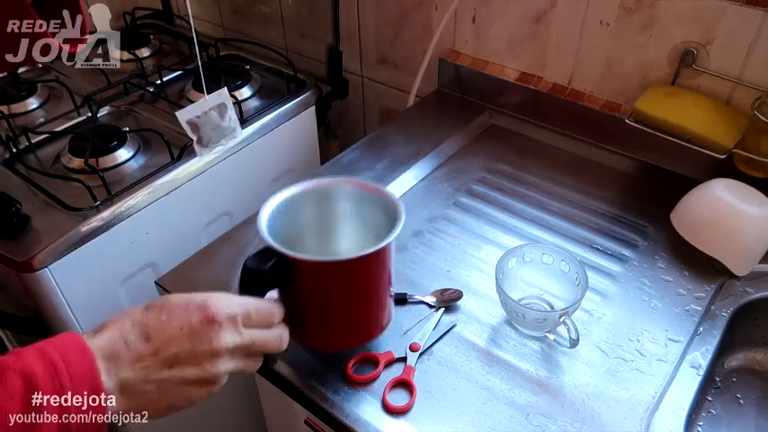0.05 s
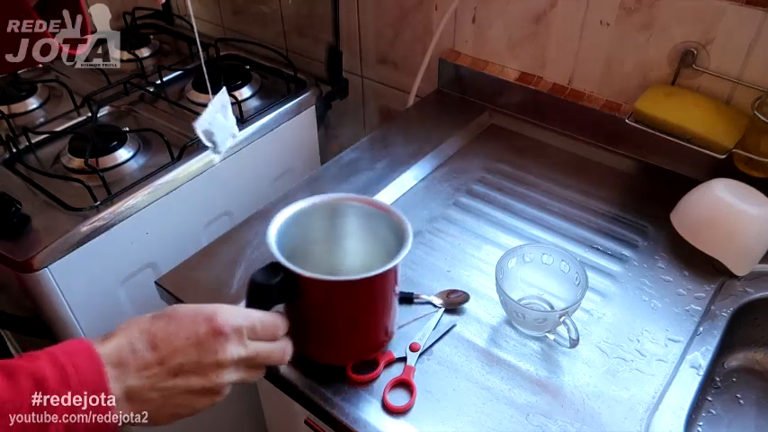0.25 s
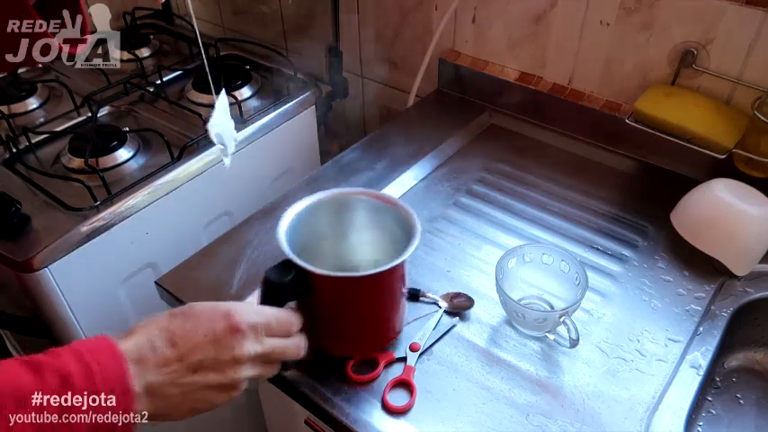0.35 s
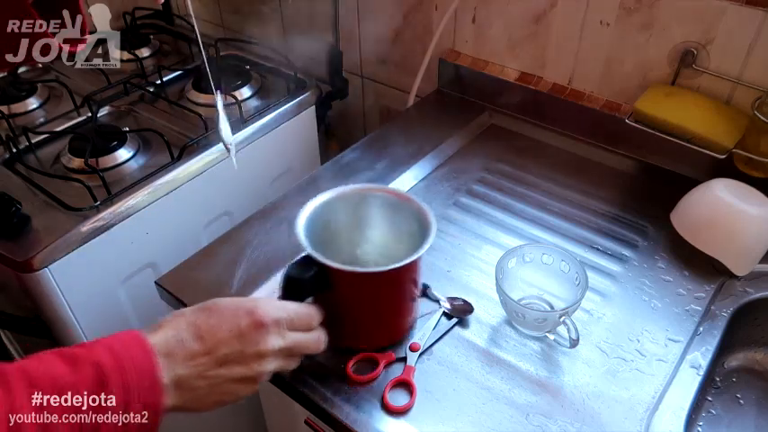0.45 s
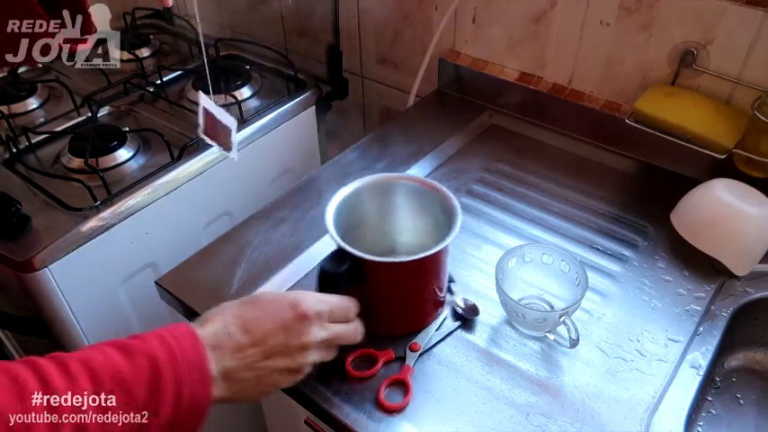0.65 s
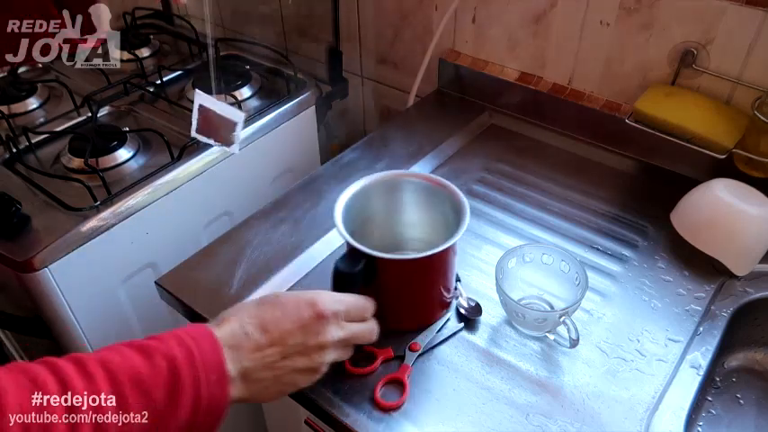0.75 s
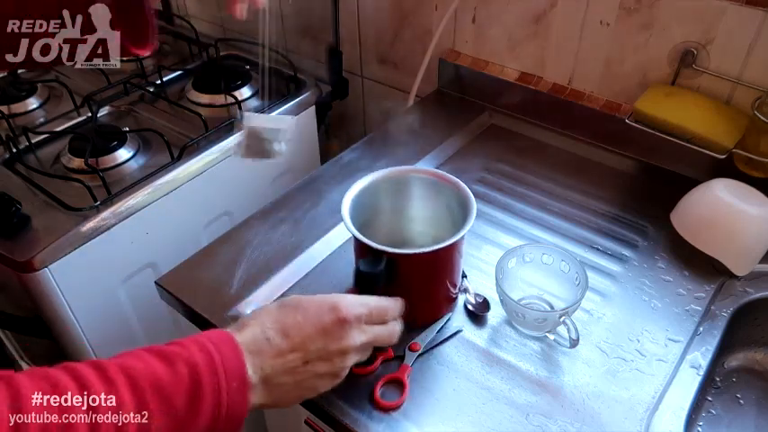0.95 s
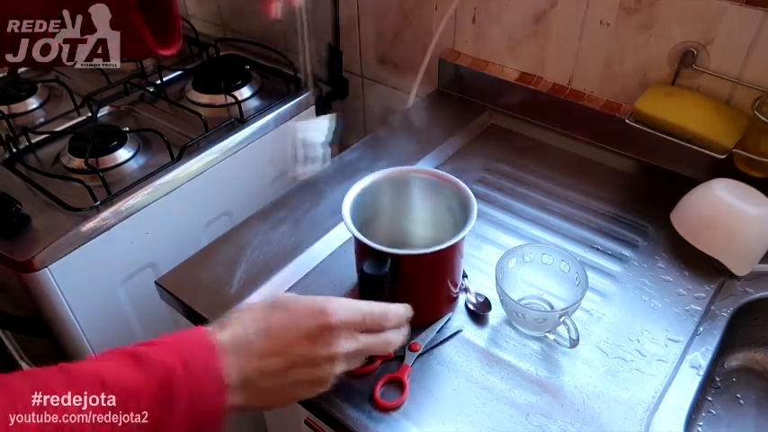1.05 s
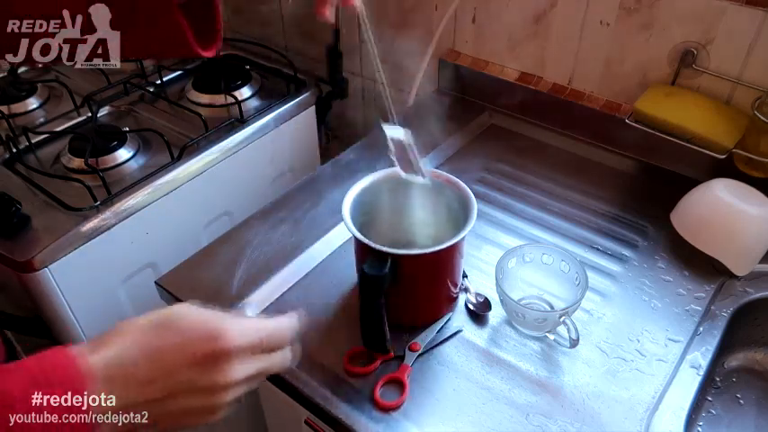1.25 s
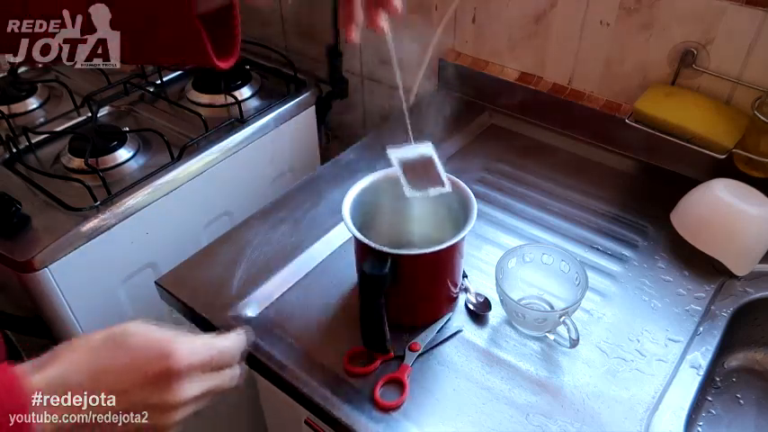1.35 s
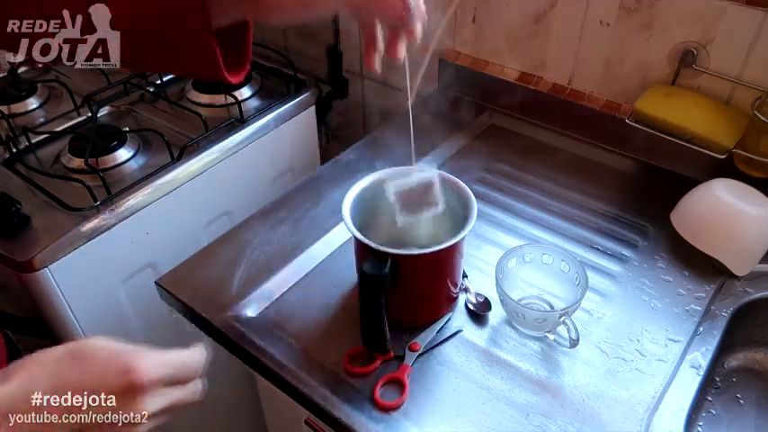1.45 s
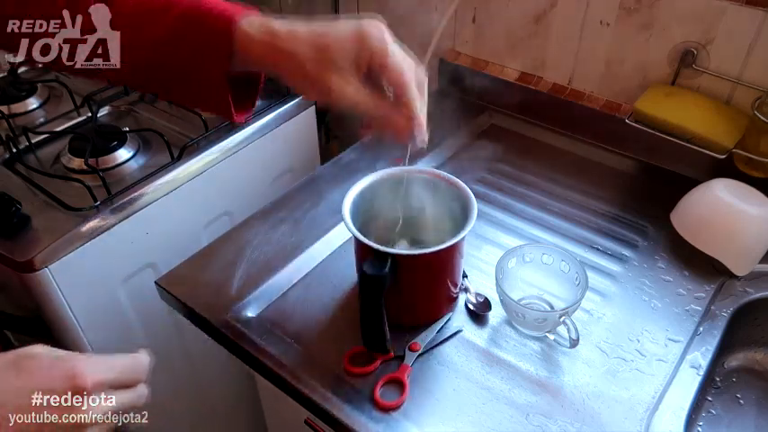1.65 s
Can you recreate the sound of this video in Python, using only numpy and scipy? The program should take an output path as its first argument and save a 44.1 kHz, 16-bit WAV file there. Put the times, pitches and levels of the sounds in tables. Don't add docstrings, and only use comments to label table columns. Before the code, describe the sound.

A metal mug meets a steel counter in a hard-walled kitchen: a dull edge knock with small rattling ticks at 0.23 seconds, a light tick at 0.45, then a hard bright knock at 0.48, settling by 0.55. The sheet metal and room ring on. A low fridge hum continues under faint steam hiss, which fades after about 1 second; tiny rim taps come near 1.4.

```python
import sys
import numpy as np
from scipy import signal
from scipy.fft import rfft, irfft
from scipy.io import wavfile
from scipy.ndimage import uniform_filter1d

SR = 44100
rng = np.random.default_rng(int(sys.argv[2]) if len(sys.argv) > 2 else 0)


def waveform_to_disk(signal):
    frames = np.transpose(np.atleast_2d(signal))
    scaled = np.clip(frames, -1, 1) * 32767
    samples = np.round(scaled).astype(np.int16)
    wavfile.write(sys.argv[1], SR, samples)


def makeup_ratio(level_db):
    decades = np.asarray(level_db, float) / 20
    return 10 ** decades


N = 74970


def evened(x):
    return x / np.sqrt(np.mean(x ** 2) + 1e-20)


def read(points, hz):
    f, value = np.transpose(points)
    return np.interp(np.log(hz + 1), np.log(f + 1), value)


def colour(x, points):
    return irfft(rfft(x) * makeup_ratio(read(points, np.fft.rfftfreq(len(x), 1 / SR))), len(x))


def add(mix, start_s, sound):
    part = mix[round(start_s * SR):][:len(sound)]
    part += sound[:len(part)]


def noise(points, level_db):
    frames, hz = N // 256 + 5, np.fft.rfftfreq(1024, 1 / SR)
    real, imag, patches = rng.standard_normal((frames, 513, 3)).T
    patches = uniform_filter1d(patches, size=12, axis=0)
    patches = evened(uniform_filter1d(patches, size=14, axis=1))
    z = (real + 1j * imag) * makeup_ratio(read(points, hz)[:, None] + 0.63 * patches)
    x = signal.istft(z, nperseg=1024, noverlap=768)[1][:N]
    return makeup_ratio(level_db) * evened(x)


# frequency in Hz, density in dB per Hz.
AIR_MID = [(15, -52), (25, -22), (43, -16.5), (121, -7), (146, -8.5), (176, -10), (1670, -21), (6900, -37),
           (15000, -53.5)]
AIR_SIDE = [(15, -86), (25, -50), (128, -44), (202, -7), (415, -3.5), (769, -11), (1630, -14.5),
            (9020, -27.5), (15000, -39)]


def room_air():
    return np.array([noise(AIR_MID, -50.5), noise(AIR_SIDE, -57.5)])


# time in seconds, pitch in Hz, level in dB.
MOTOR = [(0.0, 57, -39), (0.142, 53.6, -40.5), (0.284, 54.7, -35.5), (0.51, 54.8, -38), (0.568, 54.2, -36),
         (0.628, 57.6, -36.5), (0.946, 56.34, -43.5), (1.206, 54.7, -38), (1.358, 60.25, -42.5),
         (1.524, 59.5, -55), (1.59, 59.5, -45), (1.7, 59, -49)]
# frequency in Hz, level in dB.
HUM = [(118.8, -39.5), (178, -57.5), (237, -63.5), (357, -65)]


def fridge():
    t = np.arange(N) / SR
    s, hz, db = np.transpose(MOTOR)
    turns = np.cumsum(np.interp(t, s, hz)) / SR
    motor = makeup_ratio(np.interp(t, s, db)) * np.sin(2 * np.pi * turns)
    hum = sum(makeup_ratio(d) * np.sin(2 * np.pi * (f * t + rng.random())) for f, d in HUM)
    return np.sqrt(2) * (motor + hum)


# frequency in Hz, level in dB.
STEAM = [(300, -24), (1000, 15.5), (4000, 13), (9000, -2.5), (12500, -2), (15000, -23)]
# time in seconds, level in dB.
STEAM_LEVEL = [(0, -61.5), (.7, -55), (1.0, -61.5), (1.1, -79), (1.7, -88)]


def steam():
    flow = makeup_ratio(np.interp(np.arange(N) / SR, *np.transpose(STEAM_LEVEL)))
    return flow * np.array([noise(STEAM, 0), noise(STEAM, 1.6)])


def wobble_db(t):
    hz, phase = np.geomspace(3, 29.9, num=8)[:, None], rng.random((8, 1))
    return 6 * evened(np.sin(2 * np.pi * (hz * t + phase)).sum(0))


def rings(modes, tilt_db, t):
    total = np.zeros(len(t))
    for hz, db, t60_s in modes:
        tilt_share = 1 if hz > 700 else 0.36
        level_db = db + tilt_db * np.log2(hz / 700) * tilt_share
        decay_db = -60 * t / max(t60_s, .005)
        total += makeup_ratio(level_db + decay_db + wobble_db(t)) * np.sin(2 * np.pi * hz * t)
    return total


# frequency in Hz, level in dB.
MUG = [(700, 1.5), (1450, -6.5), (1950, -9.5), (2230, -4), (2700, -12), (3250, -7), (4650, -18),
       (6500, -26.5), (8400, -37), (12300, -54), (13600, -35)]
# frequency in Hz, level in dB, t60 in seconds.
COUNTER = [(200.35, -13, .25), (366.3, 1, 0.25), (700, 6, 0.1), (881.5, -4.5, 0.41), (1155.5, -2.5, 0.29),
           (1268, -8, 0.38), (1376, -11.5, 0.51), (1459, -9, 0.4), (1856, -17, 0.53), (2205, -6.5, 0.54),
           (2346, -12, .3), (2697, -25, .25), (3260, -22, 0.17), (4570, -18, 0.33)]
# frequency in Hz, level in dB, t60 in seconds.
CABINET = [(141.2, -19, 0.56), (168, -18, 0.38), (251.1, -15.5, 0.48), (297, -24.5, 0.35),
           (381.2, -10.5, 0.36), (431.9, -13, 0.46), (464, -16.5, 0.27), (552.3, -3.5, 0.25),
           (627.3, -4, 0.25), (826, -15, 0.49), (948, -9, 0.16)]
# frequency in Hz, level in dB.
CRACK = [(1500, -25), (3000, -14), (6000, -15.5), (10000, -31), (13500, -15.5), (16000, -24)]
BLOW_LEAD = 400


def knock(level_db, tilt_db, ring_db, clatter_db):
    t = np.arange(SR // 2) / SR
    hz, db = np.transpose(MUG)[:, :, None]
    contact_s, release_t60_s, rise_s, crack_t60_s = .0058, .016, 0.00026, 0.027
    held_s = contact_s * (700 / hz) ** 0.57
    release_db = -60 * np.maximum(t - held_s, 0) / release_t60_s
    shape = np.minimum(t / rise_s, 1) * makeup_ratio(db + tilt_db * np.log2(hz / 700) + release_db)
    body = -(shape * np.sin(2 * np.pi * hz * t)).sum(0)
    swell = 1 - np.exp(-(t / .009) ** 2)
    sheet = swell * (rings(COUNTER, tilt_db, t) + rings(CABINET, .5 * tilt_db, t))
    grit = colour(rng.standard_normal(len(t)), CRACK)
    crack = makeup_ratio(5.3 * tilt_db - 60 * t / crack_t60_s) * grit
    impulse = 1. * (np.arange(len(t)) == BLOW_LEAD)
    blow = colour(impulse, [(150, 0.024), (700, 0), (11200, 4 * clatter_db)])
    return makeup_ratio(level_db) * (body + crack), makeup_ratio(level_db + ring_db - 7.5) * sheet, makeup_ratio(level_db + 32.5) * blow


# frequency in Hz, level in dB.
CLATTER = [(120, -47), (350, -83), (700, -13), (1200, -2.5), (2200, -21.5), (3500, -52), (7000, -52.5),
           (14000, -39)]
# start in seconds, level in dB, hardness tilt in dB per octave,
# counter ring in dB, clatter tilt in dB per octave.
KNOCKS = [
    (0.2275, -10, -9.5, 0, -8.5),
    (0.4845, -3.5, 1, -3, 4.5),
    (0.515, -24.5, -26, 4.5, -7),
    (0.545, -18, -1, 2.5, 4),
]


def knocks():
    hits, sheet, blows = np.zeros((3, N))
    for start_s, *row in KNOCKS:
        body, ring, blow = knock(*row)
        add(hits, start_s, body)
        add(sheet, start_s, ring)
        add(blows, start_s - BLOW_LEAD / SR, blow)
    return hits, sheet, colour(blows, CLATTER)


def tick(level_db, hz, t60_s, ring_share):
    t = np.arange(4000) / SR
    drive = rng.standard_normal(len(t)) * 0.44 - 1.57 * (t == 0)
    band = signal.butter(3, [hz / 1.7, hz * 1.5], "bandpass", fs=SR, output="sos")
    ring_share = np.clip(ring_share, 0, 1)
    ring = ring_share * np.sin(2 * np.pi * hz * t)
    rattle = 3 * (1 - ring_share) * signal.sosfilt(band, drive)
    return makeup_ratio(level_db - 60 * t / t60_s) * (ring + rattle)


# start in seconds, level in dB, pitch in Hz, t60 in seconds,
# ring share 0-1 (below 0 acts as 0).
TICKS = [(0.228, -37.5, 4200, 0.15, -.3), (0.2285, -50, 9900, 0.35, -.3), (0.264, -48.5, 10600, 0.17, -.3),
         (0.2358, -22.5, 2000, 0.064, -.3), (0.264, -23, 2220, 0.15, -.3),
         (0.2645, -32.5, 4800, 0.021, -.3), (0.291, -29, 3000, 0.16, -.3), (0.4488, -15.5, 2380, 0.029, 0),
         (0.449, -37, 4350, 0.071, -.3), (0.457, -19.5, 2400, 0.067, -.3), (0.517, -17.5, 3400, 0.054, -.3),
         (0.5444, -20, 2550, .03, -.3), (0.45, -52.5, 11000, .04, -.3), (1.373, -34, 700, .03, 0.6),
         (1.3928, -26, 1550, 0.0094, 0.45), (1.393, -27, 2970, 0.0036, 0.45),
         (1.3997, -35, 3660, 0.034, 0.72), (1.3989, -29.5, 2640, 0.017, 0.37),
         (1.43, -47, 2630, 0.046, 0.9)]


def taps():
    mix = np.zeros(N)
    for start_s, *row in TICKS:
        add(mix, start_s, tick(*row))
    return mix


# frequency in Hz, t60 in seconds.
ROOM = [(150, 0.72), (400, 0.68), (1040, 0.77), (2760, 0.61), (7280, 0.43), (14000, 0.62)]
# frequency in Hz, level in dB.
ROOM_TONE = [(100, -3), (300, 7), (1000, -3.5), (3000, -5.5), (8000, 3.5), (15000, -24)]


def reverb(feed):
    start_s, swell_s, level_db = .0085, 0.0033, 4
    hz, t, z = signal.stft(rng.standard_normal(SR + SR // 4), SR, nperseg=256)
    decay = makeup_ratio(-60 * t / np.maximum(read(ROOM, hz), .1)[:, None])
    x = signal.istft(z * decay, SR, nperseg=256)[1]
    late_s = np.maximum(np.arange(len(x)) / SR - start_s, 0)
    x = x * (1 - np.exp(-late_s / swell_s))
    tail = colour(x / np.linalg.norm(x), ROOM_TONE)
    return makeup_ratio(level_db) * signal.fftconvolve(feed, tail)[:N]


# frequency in Hz, level in dB.
WIDE = [(100, -70), (300, -26), (1000, -20.5), (3000, -15), (5000, -3), (9000, 4.5), (14000, 2.5)]


def spread(direct, feed):
    mid = direct + reverb(feed)
    side = colour(makeup_ratio(-0.5) * signal.hilbert(direct).imag + reverb(feed), WIDE)
    return np.array([mid, side])


def scene():
    background = room_air() + steam()
    hum = fridge()
    hits, sheet, clatter = knocks()
    ticks = taps()
    feed = makeup_ratio(-4.5) * hits + makeup_ratio(-10.5) * sheet + makeup_ratio(-6) * ticks + clatter
    mid, side = spread(hits + sheet + ticks, feed) + background
    mid = mid + hum
    return np.array([mid + side, mid - side])


def band_limit(x):
    return signal.sosfilt(signal.butter(12, 16470, fs=SR, output="sos"), x)


def record(dry):
    squeeze, knee_db, recover_db_per_s, edge_hz, top = 0.22, -23.5, 25, 15500, .9
    power_db = 10 * np.log10(abs(uniform_filter1d((dry ** 2).mean(0), size=800)) + 1e-12)
    fall_db = np.arange(N) * recover_db_per_s / SR
    held_db = np.maximum.accumulate(power_db + fall_db) - fall_db
    over_db = np.maximum(held_db - knee_db, 0)
    slow_db = signal.lfilter([.002], [1, -.998], over_db)
    dull = signal.oaconvolve(dry, signal.firwin(101, edge_hz, fs=SR)[None], "same")
    limited = 1.519 * np.tanh(dull / makeup_ratio(squeeze * slow_db) / 1.534)
    return band_limit(np.clip(limited, -top, top))


dry = scene()
out = record(dry)
waveform_to_disk(out)
```